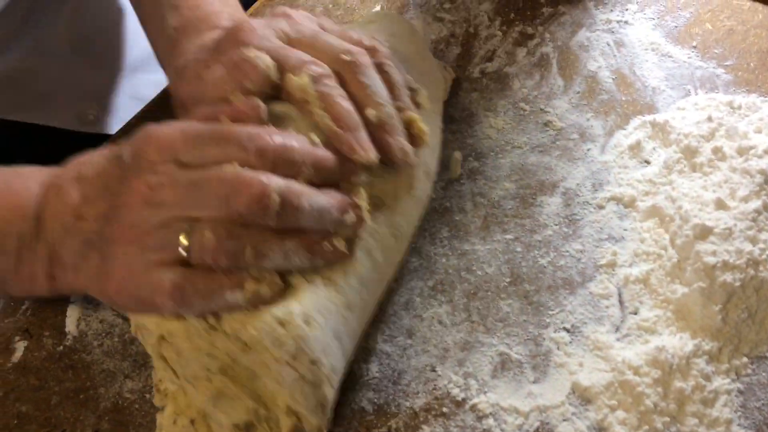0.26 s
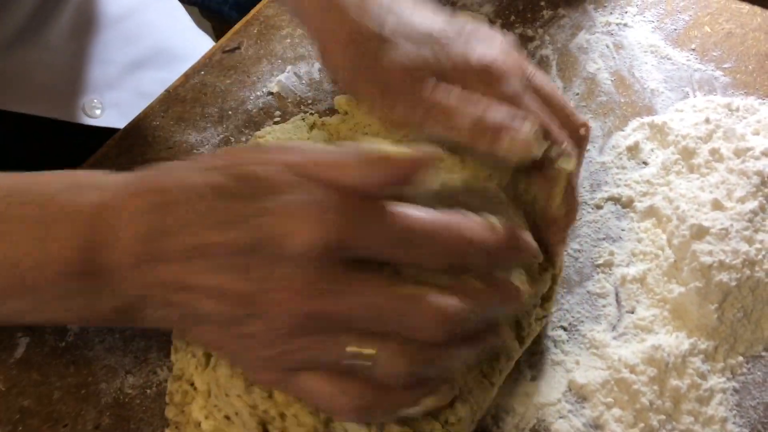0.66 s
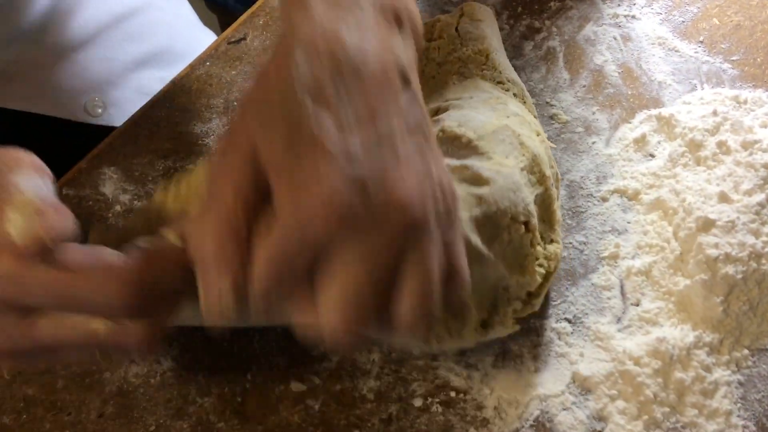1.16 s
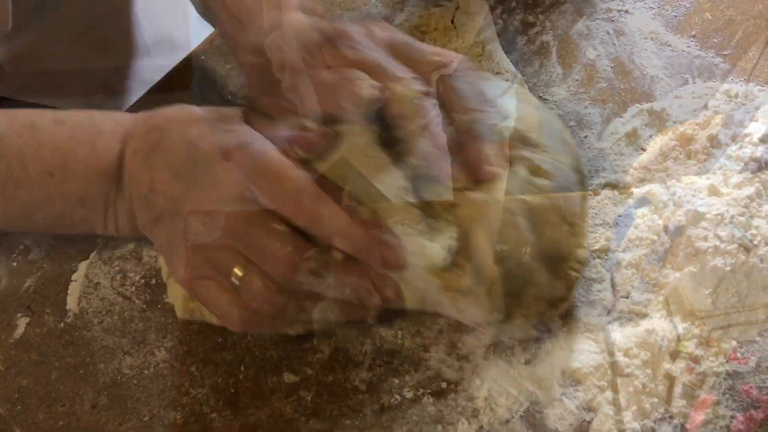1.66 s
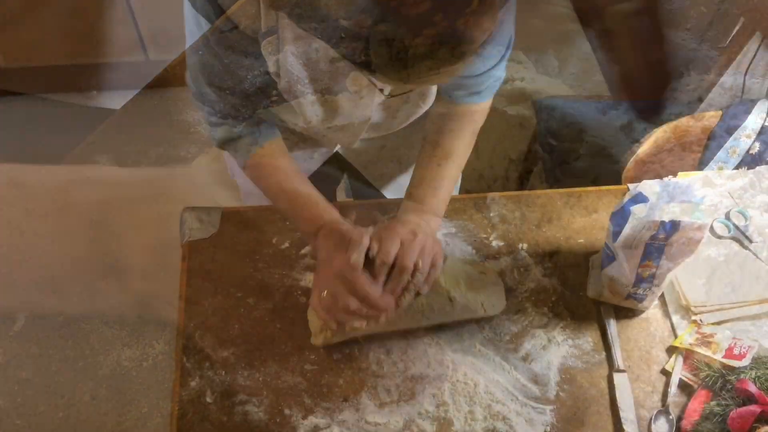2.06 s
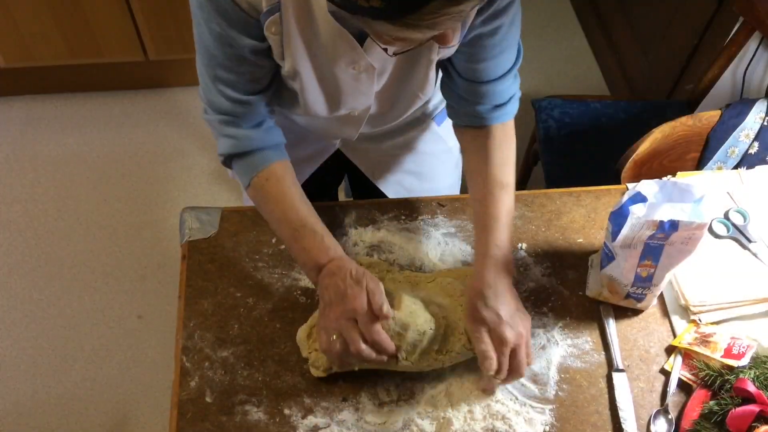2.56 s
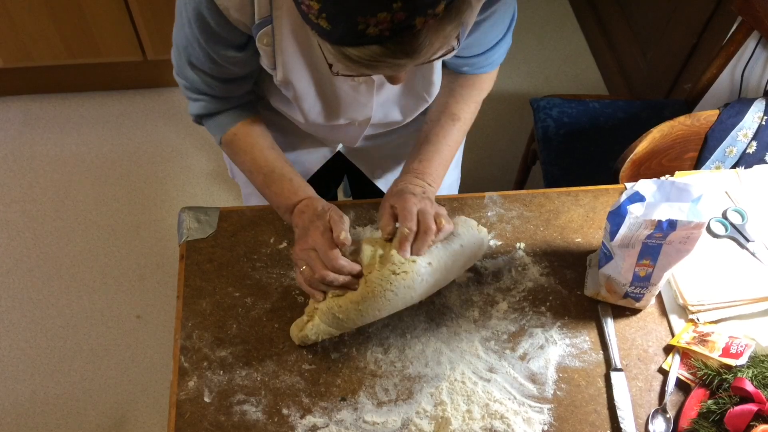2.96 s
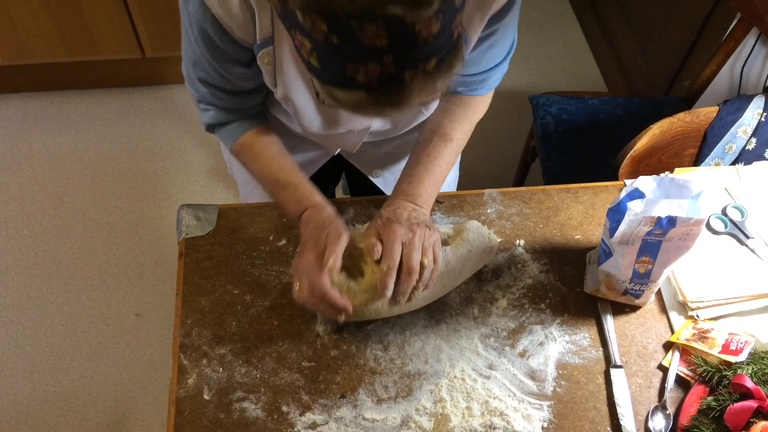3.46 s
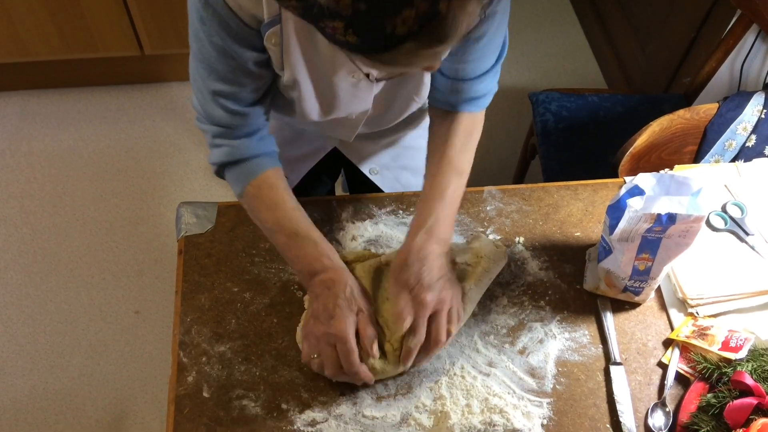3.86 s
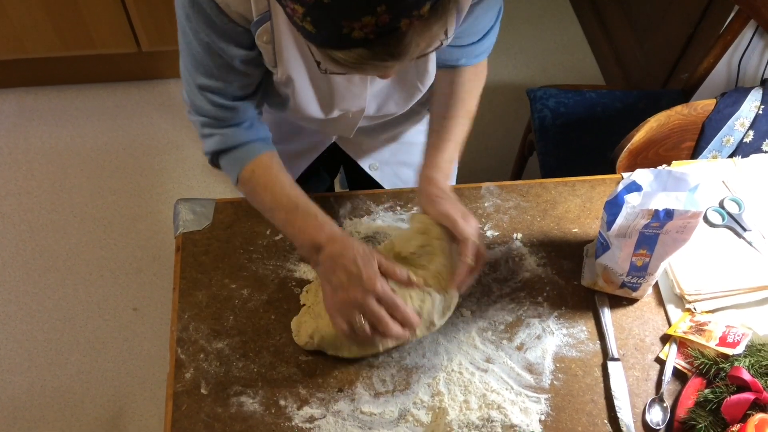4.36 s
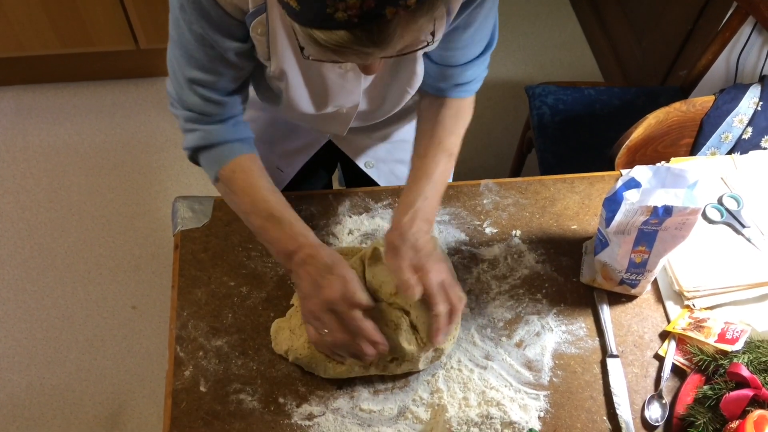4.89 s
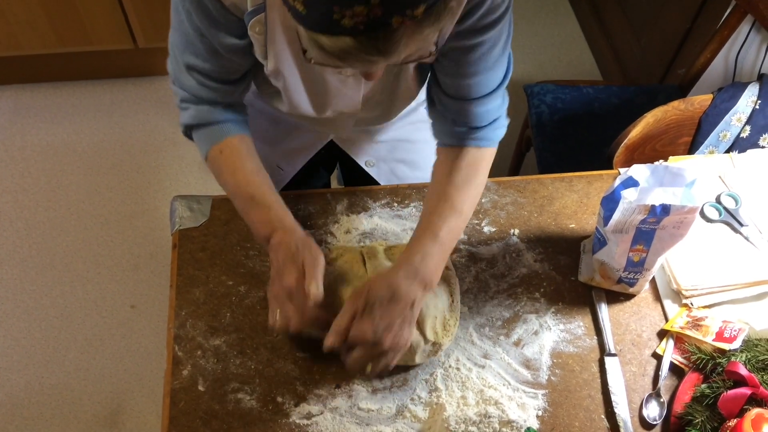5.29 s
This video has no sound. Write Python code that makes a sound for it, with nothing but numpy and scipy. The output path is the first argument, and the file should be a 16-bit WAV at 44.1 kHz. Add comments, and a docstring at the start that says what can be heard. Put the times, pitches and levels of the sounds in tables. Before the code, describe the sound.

Close to a wooden table, hands press stiff dough with gritty rubbing over flour, small squeaks from a joint, and one very heavy slapping thud near 0.9 seconds. Around two seconds the rubbing drops away as the microphone seems further off; isolated dull thumps follow at about 2.6, 4.1 and 5.1 seconds in a small, quiet kitchen.

```python
"""In a small kitchen, stiff dough is kneaded on a floured wooden table, heard close by, then further off.
Lump and hands excite the bending modes of the tabletop and the swaying modes of its frame (decaying sines).
Squeezed air slaps and flour sprays (shaped noise bursts); flour grains rub in shear (uneven noise).
A joint creaks by stick-slip (a wavering, sinking tone with rasp). The walls return diffuse echoes (decaying
noise by octave), over the quiet of the kitchen (steady coloured noise)."""
import sys
import numpy as np
from scipy import signal
from scipy.fft import rfft, irfft, next_fast_len
from scipy.io import wavfile

SR = 44100
rng = np.random.default_rng(int(sys.argv[2]) if len(sys.argv) > 2 else 0)


def wrap_up_sound(samples):
    """Save the sound to the file named by the first command line argument, as 16-bit audio."""
    columns = np.atleast_2d(samples).T
    # keep every value between -1 and 1, then stretch to whole-number steps
    tamed = np.clip(columns, -1, 1)
    steps = np.round(tamed * 32767).astype(np.int16)
    wavfile.write(sys.argv[1], SR, steps)


N = 243873
TIME = np.arange(N) / SR

# steady background of the kitchen: (frequency [Hz], relative level [dB])
KITCHEN_SPECTRUM = [(25, -8), (38, -1.5), (52, 3), (66, 4), (95, 6), (125, -3.5), (200, -8), (400, -8.5),
                    (800, -17), (2200, -18.5), (4400, -30), (7000, -26.5), (15000, -41)]
KITCHEN_DB = -62.5  # rms

# strokes of dough over flour:
# (time [s], length [s], peak level before the rub's gain [dB], place of hardest push [share of length, 0-1])
STROKES = [(0.104, 0.45, -49, 0.79), (0.57, 0.15, -52.5, 0), (0.946, .14, -55.5, 0.1),
           (1.083, 0.39, -52, .75), (1.574, .45, -56, 0.46), (2.132, 0.89, -67.5, 0.17),
           (2.736, 0.22, -72.5, 0.56), (3.033, 0.051, -71, .8), (3.293, 0.29, -71.5, 0.1),
           (3.6, .37, -66.5, 0.37), (4.1, 0.21, -73, 0.7), (4.341, 0.43, -67.5, 1), (4.81, 0.15, -71, .4),
           (5.123, 0.43, -70.5, 0.86)]
# a stroke sets in, swells to the hardest push, eases and stops
STROKE_ATTACK_S, STROKE_RELEASE_S = 0.036, 0.024
SWELL_DB_PER_S, EASE_DB_PER_S = 24.5, 35.5
# the rustle of resting hands, before the rub's gain
NEAR_REST_DB, FAR_REST_DB = -66.5, -78.5
# flour sheared between dough and wood: (frequency [Hz], relative level [dB])
RUB_SPECTRUM = [(100, 1), (250, 5.5), (500, 3.5), (1000, -0.5), (2000, 0), (3200, -3), (5500, 3),
                (8000, 0.5), (12000, 0.5), (15500, -0.5)]
# the listener draws back between these times
DRAW_BACK_S = [1.7, 2.1]

# blows of dough and hands on the table; sway is relative to the thump, room to the direct sound:
# (time [s], level [dB], lump pitch [Hz], frame sway [dB], slap level [dB], slap edge [Hz],
#  knock level [dB], knock centre [Hz], room send [dB])
BLOWS = [(0.007, -23, 163.3, 4.5, -27, 4100, -29, 930, -16.5),
         (0.149, -40, 193, 1, -46, 1200, -55.5, 396, -3), (0.62, -44.5, 156, 4, -37, 2600, -58, 900, -8.5),
         (0.871, -10.5, 204, -38, -27, 2300, -26, 604, -0.5),
         (0.8796, 1, 178.5, -26.5, -17, 1170, -10, 543, -13.5),
         (0.983, -7.5, 187.3, -12, -27, 1410, -37, 900, -10),
         (1.075, -38, 488, -12, -32, 980, -63, 526, -9.5), (1.384, -40, 141, 6, -37, 1760, -42, 696, -10),
         (1.546, -47, 150, -5, -47.5, 2560, -50.5, 1010, 2.5),
         (1.606, -54, 188, -15, -44.5, 2400, -58, 1600, -4),
         (2.6285, -18, 195, 5.5, -29.5, 1850, -32.5, 880, -8.5),
         (3.257, -32, 175.7, -4, -67.5, 600, -51, 380, -1),
         (4.084, -14, 236, -9.5, -19, 1303, -29.5, 374, -5),
         (4.192, -33, 250, 14, -33.5, 1240, -45, 800, -9.5),
         (5.108, -26.5, 194, -11, -28.5, 1880, -32, 1060, -2),
         (5.1176, -15, 162, -3, -33.5, 1180, -40.5, 373, -9),
         (5.186, -32, 229, -17, -46, 2010, -44, 385, -9),
         (5.217, -27.5, 215.4, -14, -43.5, 705, -56, 400, -8.5)]
# each thump returns twice, weaker and lower, as the table and room answer:
# (delay [s], level against the thump [dB], pitch ratio [1])
TABLE_RETURNS = [(.023, -13, 0.93), (0.066, -23.5, 0.83)]
# bending of the loaded tabletop: (frequency [Hz], level [dB], t60 [s])
TOP_MODES = [(112, -17, 0.16), (136.3, -3.5, 0.31), (177.5, -6, 0.27), (204.76, -9, 0.335),
             (226.8, -14.5, 0.48), (255, -12.5, .16), (286.9, -11.5, 0.36)]
# swaying of the frame on its legs: (frequency [Hz], level [dB], t60 [s])
FRAME_MODES = [(57, -23, .3), (70.7, -7, 0.22), (84, -12, 0.19)]
# higher notes of the top, woken by a hard contact: (frequency [Hz], level [dB], t60 [s])
KNOCK_MODES = [(360.2, 2, .12), (376, 3.5, 0.095), (420.5, -13, 0.45), (522, -24.5, 0.14), (629, 1, 0.056),
               (721, -10, 0.13), (783, 2, 0.03), (1008, -5, 0.084), (1265, -9.5, .06), (1635, -14, .06)]
# air squeezed from under the dough: (frequency [Hz], relative level [dB])
SLAP_SPECTRUM = [(50, -28), (130, -5.5), (250, 7), (450, 0), (650, -1), (900, -2), (1300, -5.5), (2000, 0),
                 (4000, -8.5)]
# flour shot out by a slap: (frequency [Hz], relative level [dB])
SPRAY_SPECTRUM = [(500, -10), (1500, 1.5), (2600, -6), (3400, 4), (4300, 2), (5800, 2.5), (8000, -9),
                  (15000, -13)]
# the top rings on under a blow; under a heavy one the dough sticks to it and damps it
RING_DB, DAMPS_ABOVE_DB, DAMP_DB_PER_DB = -3, -22, 0.57
# the slap's tail passes a second low-pass, at this ratio of its edge
SLAP_TAIL_EDGE = 0.65
# the sharper the slap, the more flour it sprays: level against the slap at the reference edge
SPRAY_DB, SPRAY_EDGE_HZ, SPRAY_DB_PER_OCTAVE = -11, 1700, 5.5
FAR_SPRAY_DB = -10.5  # change once the listener has drawn back

# reverberation of the kitchen: (frequency [Hz], t60 [s])
ROOM_T60 = [(150, 0.29), (600, 0.36), (2000, 0.36), (6000, 0.39), (14000, 0.35)]
LEAN_ROOM_DB, CREAK_ROOM_DB = -10.5, -10.5

# creaks of the joint: (time [s], length scale [s], level before mixing [dB], pitch half a length in [Hz])
CREAKS = [(0.124, 0.027, -48.5, 2070), (0.205, 0.054, -52, 1924), (0.358, 0.02, -41, 2150),
          (0.605, 0.049, -56, 1776), (0.795, 0.043, -36, 2100), (0.973, 0.0764, -44.5, 2064),
          (1.267, 0.03, -41, 2082), (1.695, .034, -38.5, 2085), (1.918, 0.047, -59.5, 1800),
          (2.173, 0.028, -56, 2137), (2.393, 0.053, -51.5, 2080), (2.874, 0.033, -55, 2150),
          (3.3, 0.052, -46.5, 2040), (3.779, 0.048, -55.5, 2093), (3.848, 0.07, -66.5, 1930),
          (4.216, 0.059, -51.5, 2110), (4.685, .05, -58, 2097), (4.857, 0.038, -55.5, 1920),
          (5.127, 0.083, -55, 2082)]
CREAK_MIX_DB = -3  # direct sound
# noise of the slipping joint: (frequency [Hz], relative level [dB])
RASP_SPECTRUM = [(400, -18.5), (800, -2.5), (1100, -3), (1350, -7), (1700, 1.5), (2600, -6), (3600, -7.5),
                 (5200, -14.5), (8000, -21), (15000, -43.5)]
# a weak creak is mostly rasp, a strong one squeaks cleanly; both are equal at this level
EVEN_RASP_DB, RASP_DB_PER_DB = -48.5, 0.5
# the joint gives in jerks, and its pitch sinks: time between jerks, dip between them
JERK_S, JERK_DIP_DB, CREAK_SAG_HZ_PER_S = 0.029, -3, 900

# weight leaned on the table, which rocks without a slap: (time [s], level [dB], pitch [Hz])
LEANS = [(0.649, -36.5, 110), (2.198, -49.5, 154), (2.77, -52.5, 180.5), (3.345, -34.5, 80),
         (4.246, -39.5, 87), (5.422, -41, 89)]
LEAN_RING_DB, LEAN_SWAY_DB = -6.5, 8.5

TOP_HZ = 15450  # upper limit of the microphone's band


def undb(db):
    """Logarithmic level: decibels to amplitude gain."""
    return 10 ** (np.asarray(db) / 20)


def unit(x):
    """Normalisation of power: scale to rms 1."""
    return x / np.sqrt(np.mean(x ** 2))


def noise(count):
    """Gaussian white noise: equal power at all frequencies."""
    return rng.standard_normal(count)


def along(hz, points):
    """Logarithmic frequency scale: interpolate (frequency [Hz], value) points."""
    f, value = np.transpose(points)
    return np.interp(np.log(np.maximum(hz, 1)), np.log(f), value)


def colour(x, points):
    """Spectral filtering: weight x by (frequency [Hz], level [dB]) points."""
    size = next_fast_len(len(x))
    gain = undb(along(np.fft.rfftfreq(size, 1 / SR), points))
    return irfft(rfft(x, size) * gain, size)[:len(x)]


def butter(x, hz, kind, order=2):
    """Butterworth filtering: low-, high- or band-pass."""
    edge = np.minimum(hz, SR / 2 - 1)
    return signal.sosfilt(signal.butter(order, edge, kind, fs=SR, output="sos"), x)


def add(track, s, x):
    """Linear superposition: mix x into the track from time s."""
    i = max(int(s * SR), 0)
    track[i:i + len(x)] += x[:max(N - i, 0)]


def fade(t, t60):
    """Exponential decay: the amplitude falls 60 dB in t60 seconds."""
    return np.exp(-np.log(1000) * t / t60)


def ring(t, modes):
    """Modal superposition: a struck body sounds as a sum of decaying sines."""
    return sum(undb(db) * fade(t, t60) * np.sin(2 * np.pi * hz * t) for hz, db, t60 in modes)


def near(modes, centre_hz, spread, reach_db):
    """Selective excitation: the spot that is hit wakes the modes around one pitch more than the rest."""
    chosen = []
    for hz, db, t60 in modes:
        octaves = np.log2(hz / centre_hz)
        loss_db = reach_db * (1 - np.exp(-(octaves / spread) ** 2))
        chosen.append((hz, db + loss_db, t60))
    return chosen


def by_distance(s, near_value, far_value):
    """Dependence on distance: a value that changes as the listener draws back."""
    return np.interp(s, DRAW_BACK_S, [near_value, far_value])


def kitchen_quiet():
    """Stationary noise: the quiet of the kitchen has a fixed spectrum and a steady level."""
    return unit(colour(noise(N), KITCHEN_SPECTRUM)) * undb(KITCHEN_DB)


def effort():
    """Addition of powers: sliding strokes combine with the rustle of resting hands."""
    power = undb(by_distance(TIME, NEAR_REST_DB, FAR_REST_DB)) ** 2
    for start, length, db, share in STROKES:
        hardest, end = start + share * length, start + length
        swell_db = SWELL_DB_PER_S * (hardest - TIME)
        ease_db = EASE_DB_PER_S * (TIME - hardest)
        below_db = np.maximum(swell_db, ease_db)
        attack = np.clip((TIME - start) / STROKE_ATTACK_S, 0, 1)
        release = np.exp(-np.maximum(TIME - end, 0) / STROKE_RELEASE_S)
        power = power + (undb(db - below_db) * attack * release) ** 2
    return np.sqrt(power)


def rub(grain_db=6.0, judder_db=1.1, judder_hz=90, gain_db=6.0):
    """Granular friction: flour grains of unequal size shear under the dough, which judders a little."""
    grains = noise(N) * undb(grain_db * noise(N))
    judder = unit(butter(noise(N), judder_hz, "low"))
    return unit(colour(grains, RUB_SPECTRUM)) * effort() * undb(gain_db + judder_db * judder)


def rumble(sliding, near_db=-8.5, far_db=-9):
    """Forced vibration: the dragging dough shakes the modes of the top and frame."""
    shake = signal.fftconvolve(sliding, ring(TIME[:SR // 2], TOP_MODES + FRAME_MODES))[:N]
    return unit(shake) * np.std(sliding) * undb(by_distance(TIME, near_db, far_db))


def thump(t, pitch_hz, ring_db, sway_db, lump_t60=0.12, radiate_hz=105, contact_s=0.0027, sway_s=0.012):
    """Impact on a plate: the lump's note wakes the top's modes near its pitch, and the frame sways below."""
    lump = ring(t, [(pitch_hz, 0, lump_t60)])
    top = undb(ring_db) * ring(t, near(TOP_MODES, pitch_hz, spread=0.5, reach_db=-6.5))
    # an open board radiates little bass
    wood = butter((lump + top) * (1 - np.exp(-t / contact_s)), radiate_hz, "high")
    sway = ring(t, FRAME_MODES) * (1 - np.exp(-t / sway_s))
    return wood + undb(sway_db) * sway


def slap(t, edge_hz, t60=0.05, tail_db=-22, tail_t60=0.15, attack_s=0.00083):
    """Air expulsion: a dull burst from under the dough dies away, with a duller tail from the room."""
    air = unit(butter(colour(noise(len(t)), SLAP_SPECTRUM), edge_hz, "low", order=6))
    burst = air * (1 - np.exp(-t / attack_s)) * fade(t, t60)
    tail = butter(air, SLAP_TAIL_EDGE * edge_hz, "low") * fade(t, tail_t60)
    return burst + undb(tail_db) * tail


def knock(t, centre_hz, contact_s=0.00023, radiate_hz=300):
    """Hard contact: its short rise wakes the higher modes of the top in a short, woody note."""
    notes = ring(t, near(KNOCK_MODES, centre_hz, spread=0.63, reach_db=-16.5))
    return butter(notes * (1 - np.exp(-t / contact_s)), radiate_hz, "high")


def spray(t, contact_s=0.012, tail_db=-16, tail_t60=0.091, grit_db=2.0, grit_hz=700):
    """Particle ejection: flour hisses out grittily while the soft dough flattens, then trails off."""
    grit = undb(grit_db * unit(butter(noise(len(t)), grit_hz, "low")))
    hiss = unit(grit * colour(noise(len(t)), SPRAY_SPECTRUM))
    flatten = 0.5 * np.exp(-(t / contact_s) ** 2)
    return hiss * (flatten + undb(tail_db) * fade(t, tail_t60))


def blows():
    """Superposed impact: thump and its returns, slap, knock and spray, as direct sound and wall send."""
    direct, walls, t = np.zeros(N), np.zeros(N), TIME[:SR // 2]

    def strike(s, sound, room_db):
        """Division of radiation: one sound goes to the listener and to the walls."""
        add(direct, s, sound)
        add(walls, s, undb(room_db) * sound)

    for s, db, pitch_hz, sway_db, slap_db, edge_hz, knock_db, knock_hz, room_db in BLOWS:
        ring_db = RING_DB - DAMP_DB_PER_DB * max(db - DAMPS_ABOVE_DB, 0)
        sharpness_db = SPRAY_DB_PER_OCTAVE * np.log2(edge_hz / SPRAY_EDGE_HZ)
        spray_db = slap_db + SPRAY_DB + sharpness_db + by_distance(s, 0, FAR_SPRAY_DB)
        wood = undb(db) * thump(t, pitch_hz, ring_db, sway_db) + undb(knock_db) * knock(t, knock_hz)
        air = undb(slap_db) * slap(t, edge_hz) + undb(spray_db) * spray(t)
        strike(s, wood + air, room_db)
        for delay_s, return_db, ratio in TABLE_RETURNS:
            answer = undb(db + return_db) * thump(t, ratio * pitch_hz, ring_db, sway_db)
            strike(s + delay_s, answer, room_db)
    return direct, walls


def room(x, build_s=0.008, bass_db=-8):
    """Diffuse reverberation: wall echoes build up, then each octave decays at its own rate."""
    t, tail = TIME[:SR // 2], 0
    for hz in 125 * 2 ** np.arange(8):
        band = butter(noise(len(t)), [hz / np.sqrt(2), hz * np.sqrt(2)], "band")
        level = undb(along(hz, [(150, bass_db), (500, 0)]))
        tail = tail + band * fade(t, along(hz, ROOM_T60)) * level
    tail = tail * (1 - np.exp(-t / build_s))
    return signal.fftconvolve(x, tail / np.sqrt(np.sum(tail ** 2)))[:N]


def creaks(slip_hz=150, chatter_db=2.0, waver=0.026, rise=0.3, crackle_db=3.5):
    """Stick-slip friction: the joint squeaks at an unsteady, sinking pitch and crackles."""
    out, t = np.zeros(N), TIME[:SR // 4]
    for s, length, db, pitch_hz in CREAKS:
        hz = pitch_hz - CREAK_SAG_HZ_PER_S * (t - length / 2)
        rasp_db = RASP_DB_PER_DB * (EVEN_RASP_DB - db)
        grip = unit(butter(noise(len(t)), slip_hz, "low"))
        drift = unit(butter(noise(len(t)), slip_hz, "low"))
        phase = 2 * np.pi * np.cumsum(hz * (1 + waver * drift)) / SR
        squeak = np.sqrt(2) * np.sin(phase)  # rms 1
        slips = noise(len(t)) * undb(crackle_db * noise(len(t)))
        rasp = unit(colour(slips, RASP_SPECTRUM))
        jerks_db = JERK_DIP_DB * (1 - np.sin(2 * np.pi * t / JERK_S)) / 2
        load = (1 - np.exp(-t / (rise * length))) * np.exp(-(t / length) ** 3)
        gain = undb(db + jerks_db + chatter_db * grip)
        add(out, s, gain * load * (squeak + undb(rasp_db) * rasp))
    return out


def leans():
    """Low-frequency loading: weight put on the table rocks it in a soft, low thump."""
    out = np.zeros(N)
    for s, db, pitch_hz in LEANS:
        add(out, s, undb(db) * thump(TIME[:SR // 2], pitch_hz, LEAN_RING_DB, LEAN_SWAY_DB))
    return out


def scene():
    """Superposition of sources: direct sounds, their echoes and the quiet of the kitchen."""
    sliding = rub()
    hits, walls = blows()
    joint, rocking = creaks(), leans()
    echoes = room(walls + undb(LEAN_ROOM_DB) * rocking + undb(CREAK_ROOM_DB) * joint)
    table = hits + rocking + undb(CREAK_MIX_DB) * joint
    return (kitchen_quiet() + sliding + rumble(sliding) + table + echoes)[None]


def record(dry, ceiling=1.8):
    """Band limits and saturation: the microphone loses the deepest bass, rounds peaks and cuts the top."""
    thin = butter(dry, 23, "high")
    rounded = thin / (1 + (thin / ceiling) ** 4) ** (1 / 4)
    return signal.sosfilt(signal.ellip(10, 0.2, 80, TOP_HZ, fs=SR, output="sos"), rounded)


dry = scene()
out = record(dry)
wrap_up_sound(out)
```